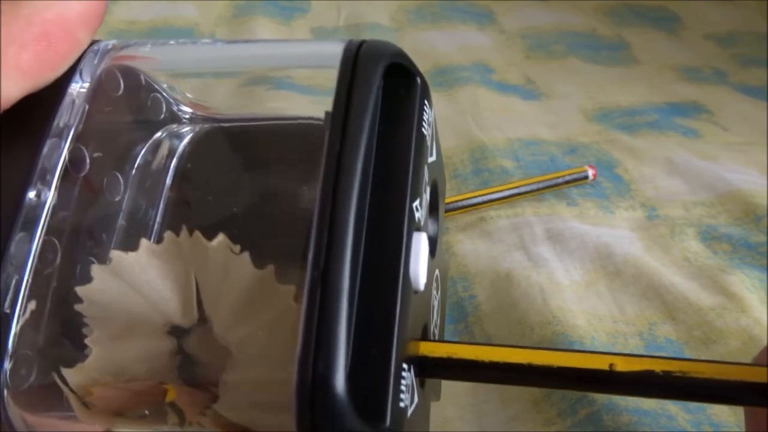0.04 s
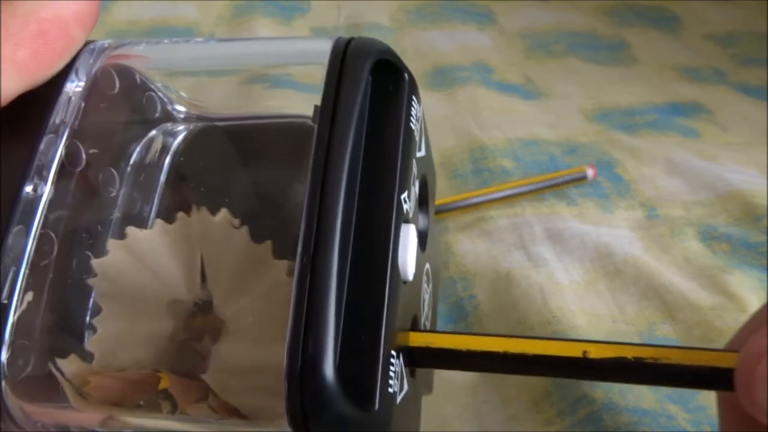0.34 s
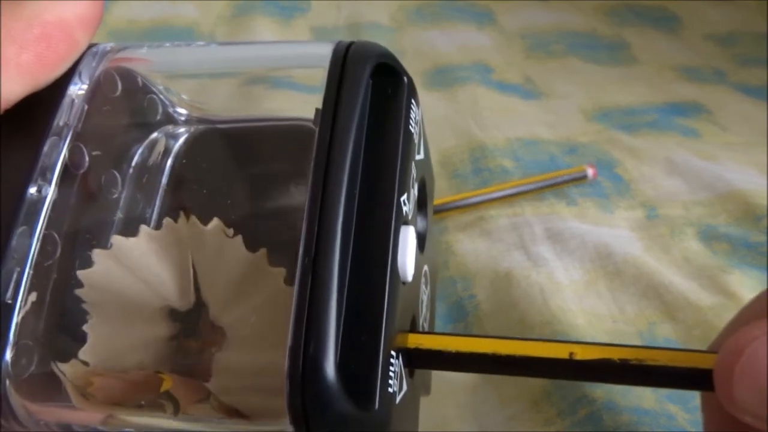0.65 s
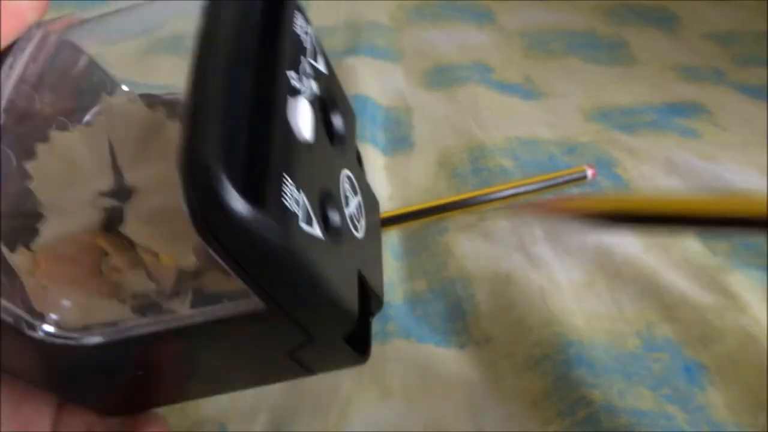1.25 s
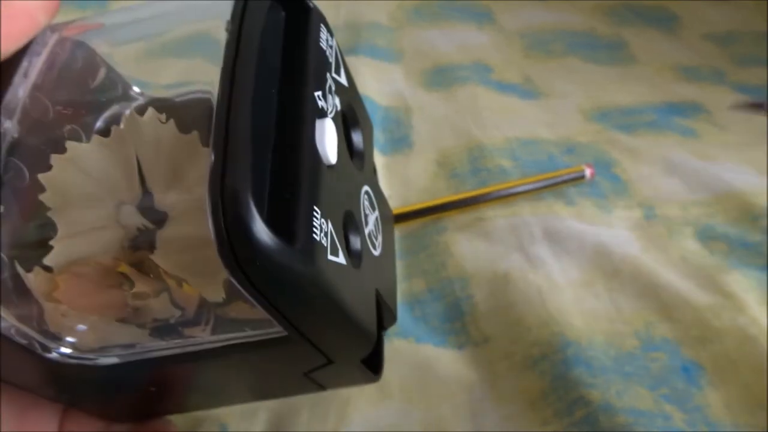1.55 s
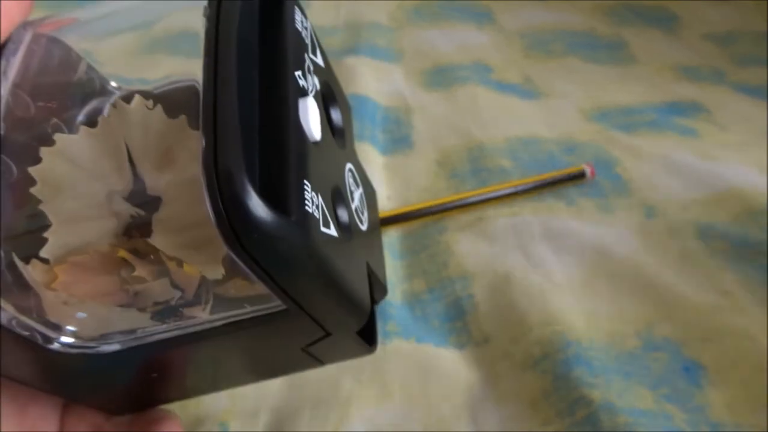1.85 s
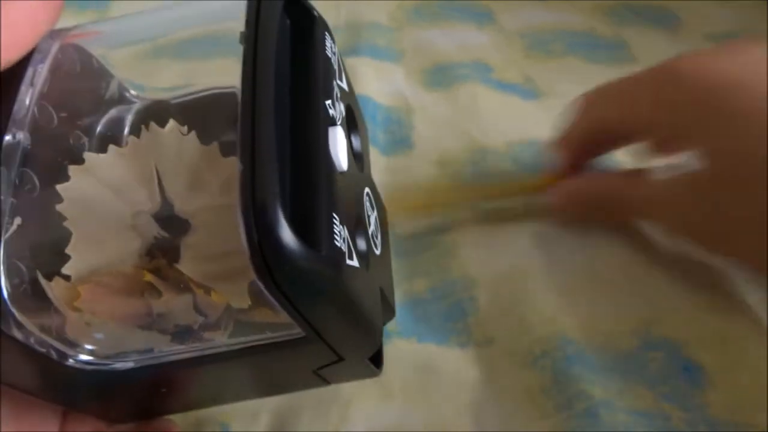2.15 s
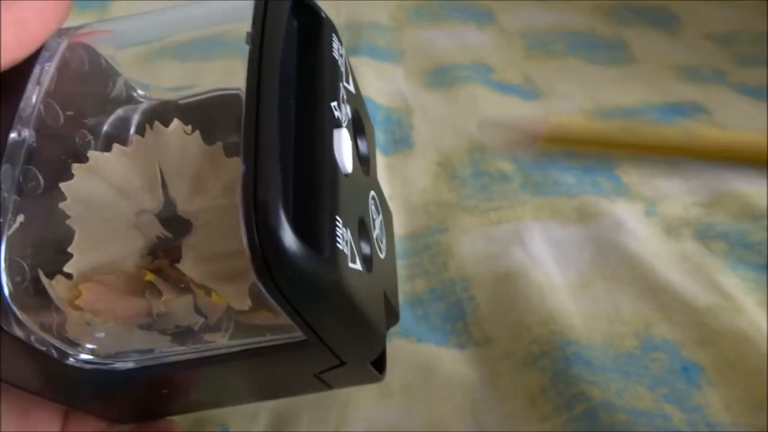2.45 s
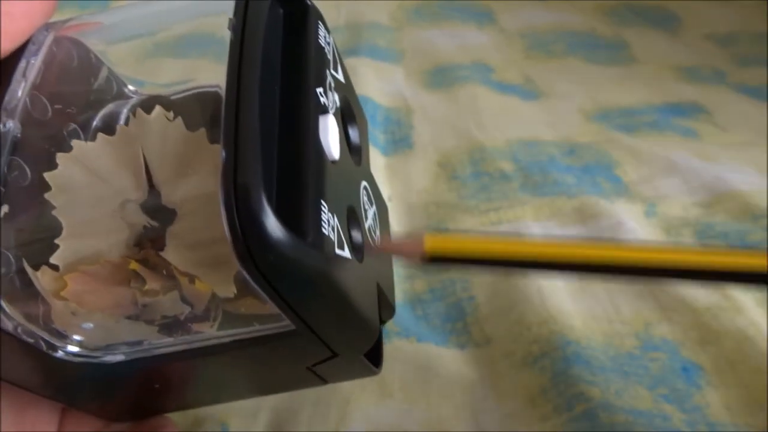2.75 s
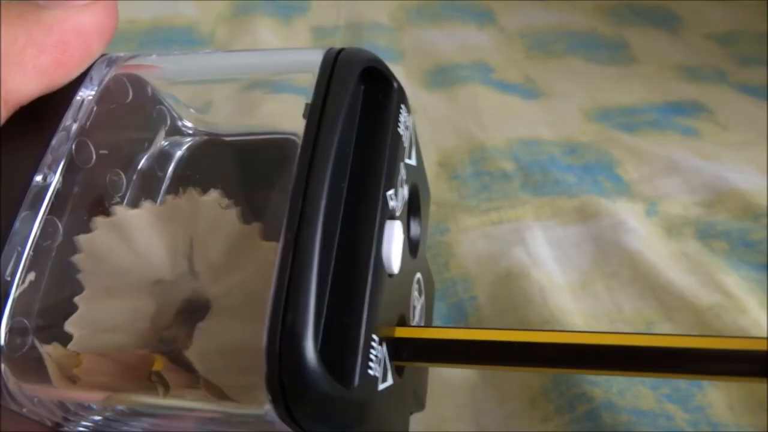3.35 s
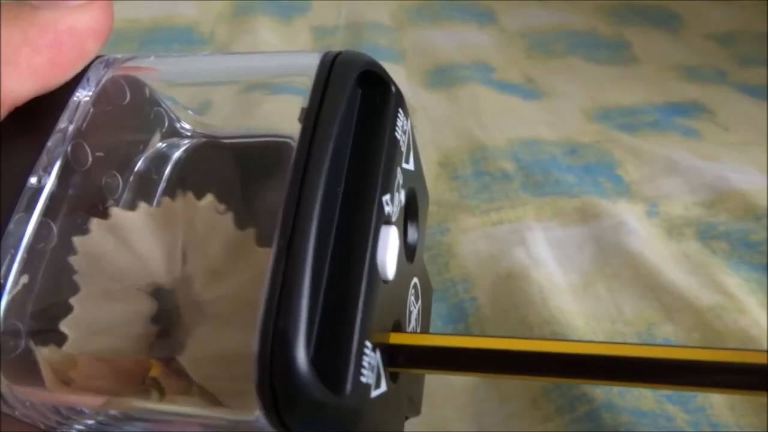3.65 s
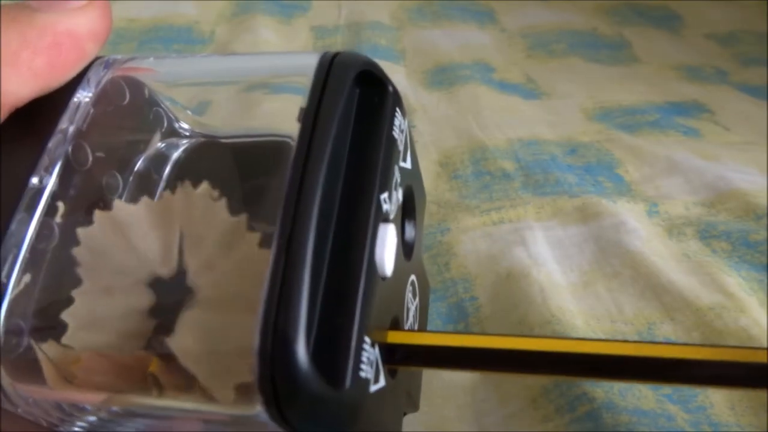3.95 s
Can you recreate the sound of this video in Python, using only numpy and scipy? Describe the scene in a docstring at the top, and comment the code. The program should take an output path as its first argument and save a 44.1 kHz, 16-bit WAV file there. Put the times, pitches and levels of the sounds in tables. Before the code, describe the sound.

Close up, an electric pencil sharpener grinds a pencil with a wavering gear whine, then speeds up and winds down with a thin whistle. Pencils tap and slide softly in the quiet room before the sharpener starts cutting again.

```python
"""A small battery pencil sharpener, held close, cuts a pencil: gears whine and rattle, wood scrapes,
and the motor sags at every turn of the blade. The pencil comes out; the motor races, then coasts to a
stop with a thin whistle. Pencils are swapped with a few taps and rubs in a quiet room. The next one
starts the motor, which races, then labours as the blade bites."""
import sys
import numpy as np
from scipy import signal
from scipy.fft import rfft, irfft
from scipy.io import wavfile
from scipy.ndimage import uniform_filter1d

SR = 44100
rng = np.random.default_rng(int(sys.argv[2]) if len(sys.argv) > 2 else 0)


def wav_record(signal):
    """Record a signal, one row per channel, as 16-bit PCM in the file named by sys.argv[1]."""
    frames = np.transpose(np.atleast_2d(signal))
    bounded = np.clip(frames, -1, 1)
    # unit amplitude maps onto the largest positive 16-bit level
    quanta = np.round(bounded * 32767).astype(np.int16)
    wavfile.write(sys.argv[1], SR, quanta)


N = 176400
TIME_S = np.arange(N) / SR
PINION_TEETH = 8

# Motor speed. Each row: time in seconds, turns per second.
MOTOR_SPEED = [(0.0, 183.8), (0.065, 183.4), (0.09, 188.4), (0.12, 181.7), (0.195, 171.4), (0.3, 179.5),
               (0.37, 180.8), (0.47, 167.9), (0.58, 179.7), (0.615, 175.3), (0.64, 179.9), (0.675, 172.7),
               (0.75, 166.1), (0.85, 181.6), (0.895, 177.0), (0.92, 181.5), (0.955, 174.2), (1.02, 170.7),
               (1.075, 189.1), (1.145, 226), (1.17, 219.2), (1.29, 160), (1.4, 118.8), (1.65, 55),
               (2.0, 12), (2.95, 12), (3.03, 138), (3.085, 188), (3.13, 216), (3.175, 224.5), (3.21, 206.6),
               (3.255, 196.8), (3.28, 182.3), (3.48, 156.6), (3.51, 170.0), (3.57, 164.0), (3.65, 164.3),
               (3.745, 156.4), (3.77, 150.4), (3.82, 169.9), (3.87, 161.4), (3.94, 166.5), (4.0, 159.5)]
# Cutting level, for scrape and loaded buzz. Each row: time in seconds, level in dB.
CUT_LEVEL = [(0, -24.5), (1.08, -24), (1.1, -29), (1.13, -119), (3.12, -44), (3.17, -26), (4, -26.5)]


def from_db(db):
    """Decibels to gain."""
    return 10 ** (np.asarray(db) / 20)


def unit_rms(x):
    """Scale to unit rms."""
    return x / np.sqrt(np.mean(x ** 2) + 1e-20)


def in_time(rows):
    """Control curve at every sample."""
    return np.interp(TIME_S, *np.transpose(rows))


def per_bin(rows):
    """Spectrum table at every frequency bin."""
    hz, value = np.transpose(rows)
    return np.interp(np.log(np.arange(N // 2 + 1) * SR / N + 1), np.log(hz), value)


def pan(left_db):
    """Left and right gains, mean one."""
    gains = from_db(np.array([[.5], [-.5]]) * left_db)
    return gains / gains.mean(axis=0)


def drift(rate_hz):
    """Slow random wander, unit rms."""
    hz = np.arange(N // 2 + 1) * SR / N
    return unit_rms(irfft(rfft(rng.standard_normal(N)) / (1 + (hz / rate_hz) ** 2), N))


def coloured(mid_side, colour):
    """Filter mid and side into unit-rms stereo, wider and further left in the treble."""
    # Each row: frequency in Hz, left-right likeness from 0 to 1.
    likeness = [(1000, 0.85), (2500, 0.6), (7000, 0.5)]
    # Each row: frequency in Hz, left over right in dB.
    lean = [(400, -1.5), (2500, 5.5), (11000, 1.5)]
    mid, side = rfft(mid_side)
    alike = per_bin(likeness)
    stereo = np.sqrt(1 + alike) * mid + np.sqrt(1 - alike) * side * [[1], [-1]]
    return unit_rms(irfft(stereo * from_db(per_bin(colour)) * pan(per_bin(lean)), N))


def noise(colour, gate=1.0):
    """Gated, coloured stereo noise."""
    return coloured(rng.standard_normal((2, N)) * gate, colour)


def die_away(clicks, decay_s):
    """Exponential tail on each click."""
    return signal.lfilter([1], [1, -np.exp(-1 / (decay_s * SR))], clicks + 1e-18)


def partial(turns, multiple, waver_db, waver_hz, lead_rad=0):
    """Wavering stereo harmonic of the shaft rotation."""
    phase = 2 * np.pi * (multiple * turns + rng.random()) + lead_rad * np.array([[.5], [-.5]])
    return unit_rms(np.cos(phase) * from_db(waver_db * drift(waver_hz)))


def gear_whine(turns):
    """Loaded teeth sing at mesh harmonics: the third leads, chatter frays the others."""
    # Third harmonic; all others; extra on the lowest. Each row: time in seconds, level in dB.
    main_level = [(0, -28.5), (.09, -15.5), (.25, -19), (.35, -23.5), (.4, -15), (.47, -20.5), (.7, -17.5),
                  (.745, -23.5), (.885, -16), (1.08, -24), (1.11, -79), (3.15, -84), (3.195, -20),
                  (3.32, -17.5), (3.485, -32.5), (3.62, -18), (3.675, -29), (3.765, -19.5), (3.795, -29.5),
                  (3.96, -19), (4, -46)]
    others_level = [(0, -23), (.445, -21.5), (1.08, -23.5), (1.1, -68), (2.99, -86.5), (3.045, -48.5),
                    (3.16, -34), (3.18, -22.5), (3.33, -23), (3.475, -17), (3.495, -22), (3.625, -20.5),
                    (3.76, -15.5), (3.815, -22), (4, -16.5)]
    lowest_boost = [(.05, 2), (.15, -10), (.8, -10), (1.08, 0), (3.05, 17), (3.14, -1.5), (4, -9.5)]
    # Tooth chatter, growing with load. Each row: time in seconds, rms timing error in turns.
    chatter = [(3.3, .0014), (3.6, .003)]
    # Each entry: shaft multiple, then level in dB, left pan in dB, left lead in radians.
    mesh = {16: (-1.9, 2.5, -0.16), 32: (-5.5, 3.6, 1.6), 40: (-7.5, 0.9, 1.7), 48: (-12, 7, 1.1),
            56: (-17.5, 3, 0.75)}
    main = partial(turns, 3 * PINION_TEETH, waver_db=2, waver_hz=56) * pan(left_db=3.5)
    harmonics = []
    for multiple, (db, left_db, lead_rad) in mesh.items():
        frayed_turns = turns + in_time(chatter) * drift(rate_hz=70)
        tone = partial(frayed_turns, multiple, waver_db=3.5, waver_hz=40, lead_rad=lead_rad)
        harmonics.append(from_db(db) * pan(left_db) * tone)
    others = from_db(in_time(lowest_boost)) * harmonics[0] + sum(harmonics[1:])
    return from_db(in_time(main_level)) * main + from_db(in_time(others_level)) * others


def buzz(turns, orders):
    """Unevenness of rotor and pinion repeats every turn."""
    return sum(from_db(db) * partial(turns, multiple, waver_db=2.3, waver_hz=20)
               * pan(left_db=2.5 * (multiple > PINION_TEETH)) for multiple, db in orders.items())


def housing(x):
    """The hollow plastic shell adds its resonances to what shakes it."""
    # Each row: resonance in Hz, gain in dB.
    peaks = [(705, -2.5), (1910, -0.5), (2900, 1), (3950, -1), (4320, -0.5)]
    width_hz = 52
    ringing = sum(from_db(db) * signal.lfilter(*signal.iirpeak(hz, hz / width_hz, fs=SR), x)
                  for hz, db in peaks)
    return unit_rms(x + ringing)


def gear_rattle(turns):
    """Each tooth lands with a tick. Racing, loose gears buzz and the pinion growls; coasting, they whirr."""
    # Each row: time in seconds, level in dB.
    rattle_level = [(0, -32.5), (1.07, -32), (1.15, -25.5), (1.3, -29), (1.63, -34), (1.71, -54.5),
                    (1.95, -62.5), (2.0, -86), (2.928, -96), (2.94, -47), (2.985, -55), (3.005, -34.5),
                    (3.04, -28.5), (3.16, -28.5), (3.3, -34)]
    growl_level = [(1.0, -59), (1.09, -33.5), (1.22, -38), (1.38, -52), (1.45, -96), (3.0, -89),
                   (3.06, -48), (3.12, -30.5), (3.18, -23.5), (3.26, -41)]
    whirr_level = [(1.1, -96), (1.4, -47.5), (1.82, -45.5), (1.97, -51), (2.02, -58), (2.2, -100)]
    # Each row: frequency in Hz, spectral density in dB.
    rattle_colour = [(150, -29), (350, -23), (620, -6.5), (1050, -1), (1280, -14), (1600, 0.5), (2250, -5),
                     (4200, -1), (7200, -10.5), (11000, -18.5)]
    whirr_colour = [(60, -11), (750, -0.5), (1080, 5), (1450, -11.5), (4000, -20.5), (10000, -29.5)]
    # Each entry: shaft multiple, relative level in dB.
    loose_orders = {1: -18.5, 3: -8.5, 4: -10.5, 5: -8.5, 7: -14}
    growl_orders = {8: 0, 9: -2.5}
    spread_db, hiss_floor, racing_turns_per_s = 1, 0.24, 220
    landings = np.diff(np.floor(turns * PINION_TEETH), prepend=0) > 0
    clicks = landings * from_db(spread_db * np.clip(rng.standard_normal(N), -2, 2))
    ticks = die_away(clicks, decay_s=0.00024) + hiss_floor
    racing = (in_time(MOTOR_SPEED) / racing_turns_per_s) ** 5
    rattle = housing(noise(rattle_colour, ticks)) + racing * buzz(turns, loose_orders)
    growl = from_db(in_time(growl_level)) * buzz(turns, growl_orders)
    whirr = from_db(in_time(whirr_level)) * noise(whirr_colour, ticks)
    return from_db(in_time(rattle_level)) * rattle + growl + whirr


def loaded_buzz(turns):
    """Rotor and pinion buzz under the cutting load."""
    # Each entry: shaft multiple, level in dB relative to the scrape.
    orders = {1: -29.5, 3: -25, 6: -11, 8: -18, 9: -13.5, 11: -10.5, 12: -18, 14: -18, 15: -19, 21: -11.5,
              25: -13, 27: -12, 29: -17}
    return from_db(in_time(CUT_LEVEL)) * buzz(turns, orders)


def blade_scrape(turns):
    """Wood scrapes grainily on the blade; each motor turn partly repeats the last, so it rasps."""
    # Each row: frequency in Hz, spectral density in dB.
    colour = [(300, -33), (700, -3), (1250, -18), (2000, -5.5), (3300, -16), (4200, 3.5), (5000, -6.5),
              (7800, -4.5), (9500, -10.5)]
    steps_per_turn, repeat_share, chip_db = 2048, .3, 2.5
    oversample = 8  # smooths the roughness within each turn
    rough = rng.standard_normal((2, int(turns.max()) + 1, steps_per_turn // oversample))
    rough = signal.lfilter([1], [1, -repeat_share], rough, axis=1).reshape(2, -1)
    rough = signal.resample_poly(rough, oversample, 1, axis=1)
    rasp = [np.interp(turns * steps_per_turn, np.arange(len(row)), row) for row in rough]
    chips = from_db(chip_db * drift(rate_hz=90))
    return from_db(in_time(CUT_LEVEL)) * coloured(rasp * chips, colour)


def room_tone():
    """Faint, steady, dull room noise."""
    # Each row: frequency in Hz, spectral density in dB.
    colour = [(25, -0.5), (300, 0), (480, 2), (1000, -10), (11000, -24.5)]
    return from_db(-61.5) * noise(colour)


def whistle():
    """A thin tone glides up and down as the motor coasts."""
    # Each row: time in seconds, pitch in Hz, rms level in dB.
    glide = [(1.452, 8700, -73), (1.515, 9200, -49), (1.57, 9400, -54), (1.644, 9100, -58),
             (1.739, 9000, -59), (1.807, 10300, -55.5), (1.85, 9600, -59), (1.895, 8000, -71),
             (1.96, 8000, -70)]
    time_s, hz, db = np.transpose(glide)
    pitch_hz = uniform_filter1d(np.interp(TIME_S, time_s, hz), size=900)
    level = from_db(np.interp(TIME_S, time_s, db, left=-200, right=-200))
    return np.sqrt(2) * level * np.sin(2 * np.pi * np.cumsum(pitch_hz) / SR)


def ring(force, modes):
    """Sum of damped modes driven by a force."""
    total = np.zeros(N)
    for hz, db, t60_s in modes:
        radius, step_rad = np.exp(-np.log(1000) / (t60_s * SR)), 2 * np.pi * hz / SR
        feedback = [1, -2 * radius * np.cos(step_rad), radius ** 2]
        total += from_db(db) * signal.lfilter([.5, 0, -.5], feedback, force + 1e-18)
    return total


def body_thud(force):
    """A firm bump shakes the whole sharpener."""
    # Each row: mode in Hz, level in dB, T60 in seconds.
    modes = [(89, -6, 0.08), (277, -0.5, 0.024), (437, -1, 0.022), (1010, -2.5, .04), (2900, -12, 0.036)]
    return ring(force, modes)


def case_ring(force):
    """A soft contact rings the plastic case in a narrow band."""
    # Each row: mode in Hz, level in dB before the band-pass, T60 in seconds.
    modes = [(728, -4, 0.017), (1920, -24.5, .03), (2430, -12.5, 0.015)]
    low_hz, high_hz = 500, 1030
    contact = signal.butter(2, (low_hz, high_hz), "band", fs=SR, output="sos")
    return signal.sosfilt(contact, ring(force, modes))


def handling():
    """Pencil and hand tap the case; the pencil slides on cloth and plastic."""
    # Each row: start in seconds, then drive in dB of thud, case ring and tick.
    knocks = [(1.7641, -28.5, -22, -42), (2.038, -51.5, -34, -61), (2.652, -68, -15, -50.5),
              (2.7814, -69, -30, -40.5)]
    # Each row: peak time, rise and fall in seconds, then drive in dB of thud, case ring and hiss.
    slides = [(2.065, 0.021, 0.046, -50.5, -59, -55), (2.128, 0.013, 0.013, -76, -64, -43),
              (2.71, 0.014, 0.014, -80, -49.5, -77)]
    taps, rubs = np.zeros((2, 3, N))
    for start_s, *drives_db in knocks:
        taps[:, int(start_s * SR)] += from_db(drives_db)
    for peak_s, rise_s, fall_s, *drives_db in slides:
        age_s = TIME_S - peak_s
        envelope = np.exp(-np.where(age_s < 0, (age_s / rise_s) ** 2, age_s / fall_s))
        rubs += from_db(drives_db)[:, None] * envelope
    tap_thud, tap_case, tap_tick = taps
    rub_thud, rub_case, rub_hiss = rubs
    friction = rng.standard_normal(N)
    tapped = body_thud(tap_thud) + case_ring(tap_case)
    rubbed = rub_thud * unit_rms(body_thud(friction)) + rub_case * unit_rms(case_ring(friction))
    # Each row: frequency in Hz, spectral density in dB.
    edge_colour = [(200, 1), (1200, -5), (1750, 5), (4300, 3.5), (5500, 0.5), (11000, -6.5)]
    edge = (die_away(tap_tick, decay_s=0.0075) + rub_hiss) * noise(edge_colour)
    return tapped + rubbed + edge


def with_echo(x, echo_db=-7, t60_s=0.25):
    """The room adds a faint, short tail."""
    tail = rng.standard_normal((2, SR // 2)) * np.exp(-np.log(1000) * TIME_S[:SR // 2] / t60_s)
    return x + from_db(echo_db) * signal.fftconvolve(x, tail / np.linalg.norm(tail[0]), axes=1)[:, :N]


def scene():
    """One shaft drives gears and blade; whistle, handling and room lie around it."""
    jitter_turns = 0.0021 * drift(rate_hz=26)
    turns = np.cumsum(in_time(MOTOR_SPEED)) / SR + jitter_turns
    motor = gear_whine(turns) + gear_rattle(turns) + loaded_buzz(turns)
    return motor + blade_scrape(turns) + whistle() + with_echo(handling()) + room_tone()


def record(dry):
    """Steep low-pass."""
    cutoff_hz = 11020
    return signal.sosfilt(signal.ellip(12, .1, 80, cutoff_hz, fs=SR, output="sos"), dry)


dry = scene()
out = record(dry)
wav_record(out)
```